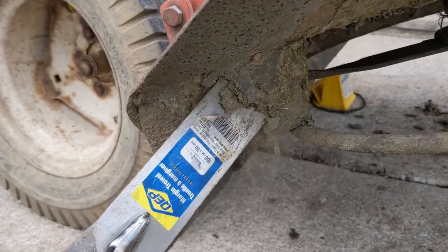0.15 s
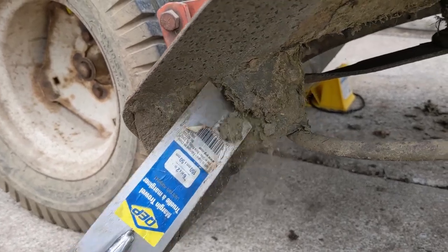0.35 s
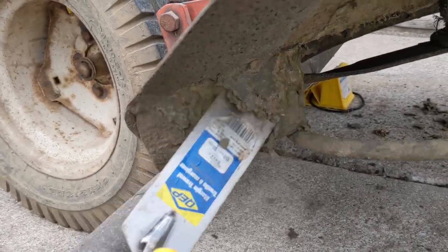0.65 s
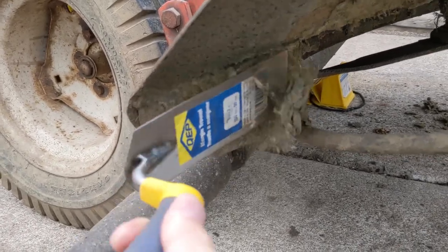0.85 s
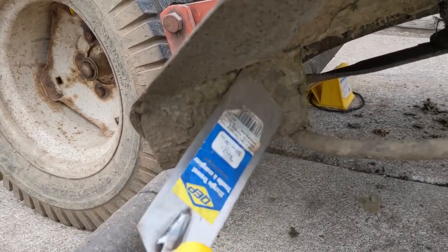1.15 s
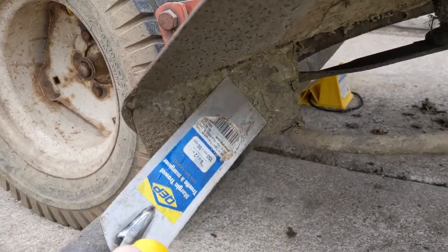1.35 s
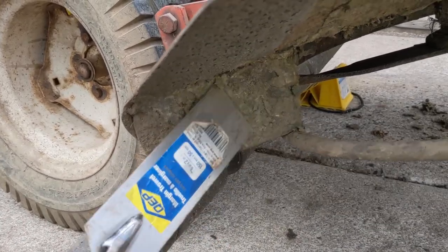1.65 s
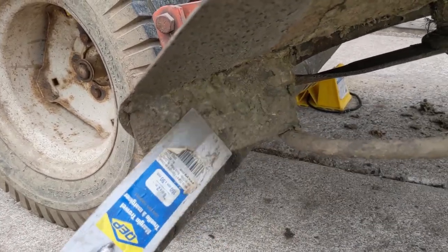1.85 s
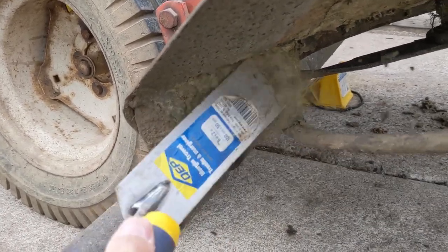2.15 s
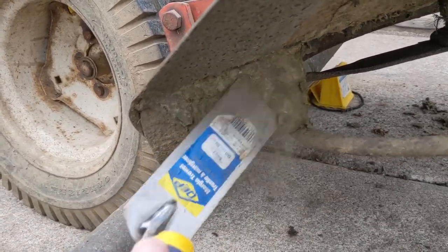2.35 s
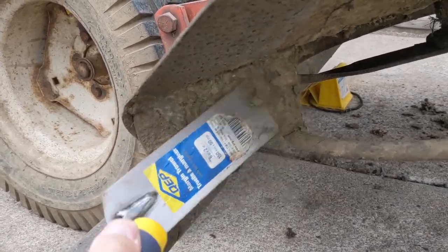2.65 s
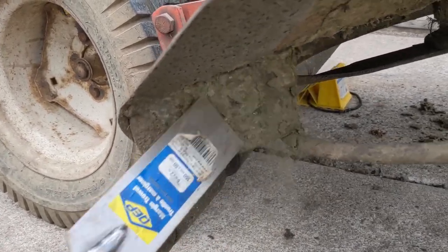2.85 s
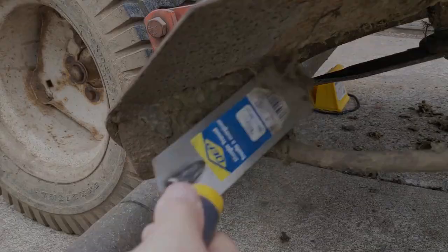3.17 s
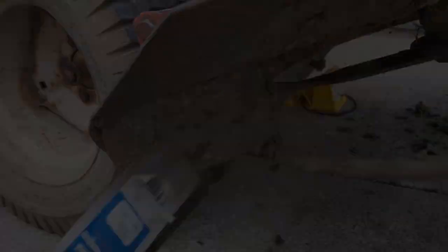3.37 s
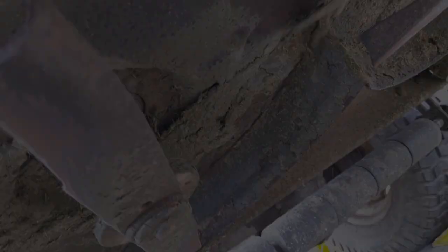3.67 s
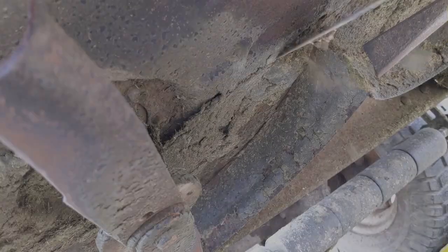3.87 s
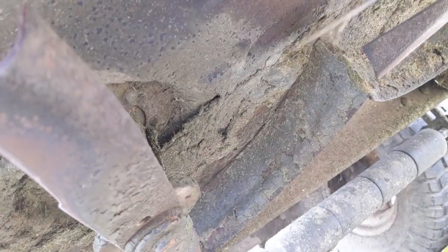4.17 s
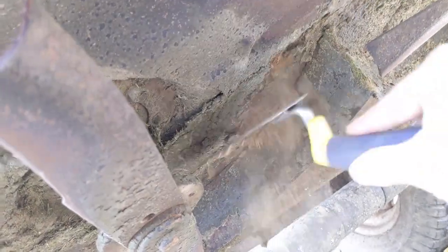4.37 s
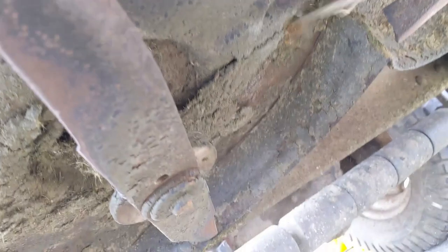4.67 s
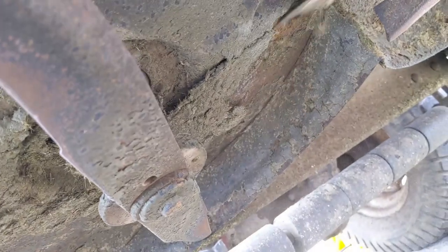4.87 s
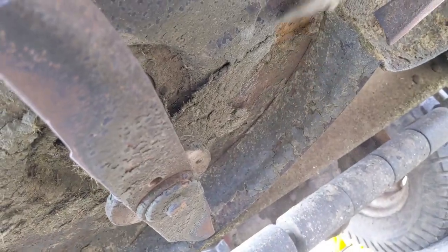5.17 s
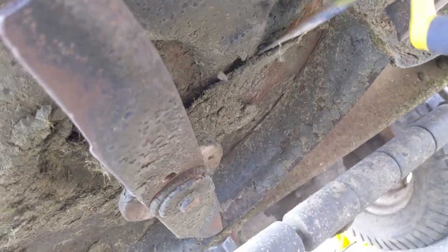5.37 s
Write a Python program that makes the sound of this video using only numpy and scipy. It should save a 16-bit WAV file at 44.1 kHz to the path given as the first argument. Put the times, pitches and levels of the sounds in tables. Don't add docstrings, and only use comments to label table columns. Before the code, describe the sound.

A steel trowel scrapes and jabs caked grass off a mower's metal deck in rough gritty strokes, first from the side, then from underneath.

```python
import sys
import numpy as np
from scipy import signal
from scipy.io import wavfile
from scipy.ndimage import uniform_filter1d

SR = 44100
rng = np.random.default_rng(int(sys.argv[2]) if len(sys.argv) > 2 else 0)


def waveform_to_disk(signal):
    frames = np.transpose(np.atleast_2d(signal))
    scaled = np.clip(frames, -1, 1) * 32767
    samples = np.round(scaled).astype(np.int16)
    wavfile.write(sys.argv[1], SR, samples)


def natural_amplitude(level_db):
    exponent = np.asarray(level_db, float) / 20
    return 10 ** exponent


N = 243431
T = np.arange(N) / SR
HZ = np.fft.rfftfreq(N, 1 / SR)
SCENE_CHANGE_S, UNDER_VIEW_S = 3.564, 3.599

# time_s, force_db
DRAG = [(0, -51), (0.05, -84), (0.249, -48), (0.84, -50), (0.949, -81), (1.66, -57), (1.78, -72.5),
        (2.42, -69), (2.82, -60.5), (2.97, -67), (3.22, -70), (3.4, -45), (3.58, -48), (3.77, -61),
        (4.5, -62), (4.641, -36), (5.07, -60.5), (5.52, -77)]
# start_s, force_db, fall_ms (per 6 dB), fizz_db, body_db
STRIKES = [(0.155, -17, 7, 4.5, -31), (0.301, -17.5, 7, -5, 4.5), (0.358, -19.5, 12, 2.5, -19),
           (0.481, -23, 8.5, 3.5, -19), (0.545, -18.5, 8, 5.5, 5), (0.773, -15.5, 7, -2.5, 6),
           (1.142, -23.5, 5, -9, 9.5), (1.83, -29.5, 30, -6, 4), (1.897, -22, 4, -20, 9.5),
           (2.183, -12, 11.5, -0.5, -6.5), (2.468, -33, 30.5, -2.5, 3), (2.733, -19.5, 2, -4, 6),
           (2.851, -28, 10.5, -6, 10), (3.006, -17, 9, 0, 0), (3.248, -22, 2, 4.5, -28),
           (3.28, -15, 7, 1.5, -13), (4.187, -31.5, 5, 7, -15), (3.433, -15, 8, 1.5, -18),
           (3.602, -24.5, 7, 0, -1.5), (4.071, -22.5, 8.5, -3.5, -33), (3.26, -20, 11, 6.5, -24),
           (4.32, -19, 6, -9, -10), (4.805, -18, 5, 4, -3), (5.385, -18, 2, 6, -1)]
# peak_s, force_db, rise_ms (per 6 dB), fizz_db, body_db
SHOVES = [(0.083, -33, 12, 1, 7), (0.111, -28, 9.5, -15, -34), (0.174, -19.5, 18, -11, -18),
          (1.213, -22.5, 12, -5, -25), (1.848, -19, 8.5, -7.5, -31), (2.201, -17, 10, 0, -36),
          (2.472, -15, 4, -6.5, -17), (2.49, -19, 12, 1.5, 5), (3.47, -14, 0.5, -24, -3),
          (3.492, -16, 12, 1, -22), (3.67, -19, 21.5, -4, 2.5), (3.812, -19, 6.5, -5.5, -24),
          (3.834, -24, 17, -6, -1.5), (3.882, -23, 12, -2.5, 0), (3.91, -16.5, 19.5, -1.5, -3),
          (4.145, -18.5, 18, 3, 5), (4.381, -16, 16, 0, -5.5), (4.574, -29, 21, 7, 1),
          (4.68, -15.5, 12.5, 1.5, -11), (4.745, -18.5, 15, 5, -1), (4.773, -24, 7, 3.5, 5.5),
          (5.004, -22, 18, -2.5, 4), (5.166, -23, 7.5, -3, 2.5), (5.466, -24, 25, 3.5, 3.5)]
# peak_s, force_db, rise_ms, fall_ms (per 6 dB)
SKIMS = [(0.285, -32, 4.6, 50), (0.531, -31, 1, 15), (0.701, -32.5, 22.5, 20), (0.766, -31.5, 19, 20),
         (0.869, -42.5, 15, 46), (0.998, -42.5, 8, 8), (1.032, -41.5, 6, 3), (1.103, -42.5, 36, 7),
         (1.256, -33.5, 43, 8), (1.28, -46, 3, 3), (1.302, -32.5, 9, 11), (1.322, -37, 1.8, 16.5),
         (1.422, -33, 12, 3), (1.572, -40.5, 1.4, 16), (1.708, -37, 5.3, 9), (1.798, -49, 28, 8),
         (2.295, -44, 20, 8), (2.329, -42.5, 21, 10), (2.606, -44, 12, 6), (2.713, -30.5, 8.7, 16),
         (2.75, -30.5, 16, 22), (3.16, -54, 13, 11.5), (2.769, -28, 11, 10.5), (3.116, -45.5, 13, 24),
         (3.307, -32, 4.4, 30), (3.4, -43, 24, 30), (3.347, -23, 1.3, 7), (3.652, -15.5, 7.5, 10.5),
         (4.397, -22.5, 5.9, 10.5), (4.538, -24.5, 8.1, 8.5), (4.596, -33, 22, 7), (4.89, -29.5, 4.3, 9.5),
         (4.937, -36.5, 17, 34), (5.113, -39, 12.7, 32), (5.297, -31, 14, 2)]
# start_s, force_db, fall_ms (per 6 dB)
CLODS = [(0.065, -39, 13), (0.137, -32, 31), (0.612, -37, -4), (1.278, -39.5, 2.5), (1.606, -39, 14),
         (2.032, -48.5, 8.5), (2.11, -52, 13), (2.677, -38, 10), (3.802, -40, 33), (4.41, -38.5, 16.5),
         (4.525, -55, 13), (5.245, -43.5, 16.5), (5.44, -63, 5)]
# pitch_hz, density_db (per Hz)
GRIT_COLOUR = [(59, -42.5), (100, -0.5), (368, 2.5), (529, -19), (1000, 8), (5200, -13), (7170, -19),
               (15100, -17)]
# pitch_hz, width_hz, level_db
PRESSED_BLADE = [(670, 26, -6.5), (1385, 45, -5), (1060, 70, -6), (2190, 80, -6), (2700, 90, -1),
                 (4600, 90, -8), (3950, 90, -4), (6890, 300, -7.5), (7517, 49, -6), (8410, 60, -16),
                 (9786, 250, -4.5), (11730, 120, -9.5)]
# pitch_hz, width_hz, level_db
PAN_SIDE = [(181, 94, -9), (320.3, 67, -7), (424, 105, -14), (810, 180, -9)]
# pitch_hz, width_hz, level_db
PAN_UNDER = [(182, 34, -7.5), (280, 104, -5), (410, 57, -3), (610, 46, -8), (760, 72, -4.5)]
# pitch_hz, level_db
HUM_COLOUR = [(15, -45), (25, 10), (153, 18), (2000, -10.5), (2610, -17.5), (4870, -29.5), (7110, -29.5),
              (12200, -33)]
# time_s, level_db
HUM_LEVEL = [(0, -21), (.08, -43), (3.5, -47), (3.6, -33), (5.52, -38)]
# start_s, end_s, middle_db, upper_db, high_db
CHATTER = [(0.057, 0.148, -51, -61, -52), (0.39, 0.468, -58, -65, -61), (1.061, 1.104, -49, -61, -46.5),
           (1.2, 1.272, -39.5, -58, -50), (2.589, 2.627, -57, -66, -55.5), (2.701, 2.795, -41, -59, -47),
           (3.103, 3.132, -49, -64, -50), (3.25, 3.299, -27, -31.5, -27), (3.301, 3.345, -44, -40, -38),
           (3.347, 3.388, -57, -43.5, -50), (3.389, 3.432, -50, -42, -40.5),
           (3.434, 3.499, -26.5, -29.5, -33), (4.529, 4.56, -29, -35, -35), (4.568, 4.607, -32.5, -40, -37),
           (4.612, 4.664, -45.5, -53, -42), (4.887, 4.923, -45, -47.5, -50), (4.925, 4.993, -51, -53, -44),
           (5.101, 5.131, -38, -47.5, -39), (5.139, 5.181, -40, -48, -38.5),
           (5.421, 5.469, -39, -38.5, -38)]
# pitch_hz, width_hz, level_db
SINGING = [
    [(2596, 29, -1.5), (1886, 40, -10)],
    [(3110, 31, -3.5), (3925, 73, -2), (4550, 60, -13), (5340, 46, -14.5)],
    [(6270, 69, -15), (6965, 56, -5), (7350, 50, -7), (8260, 61, -10), (9740, 90, -11), (12200, 96, -13)],
]
# start_s, peak_db, pitch_hz, t60_s
KNOCKS = [(0.08, -23.5, 760, 0.13), (0.17, -24, 331, 0.21), (1.145, -21.5, 297, 0.076),
          (1.9, -19, 679, 0.21), (0.55, -26.5, 670, 0.28), (3.49, -18, 693, 0.11), (2.105, -34, 500, 0.11),
          (3.65, -16, 392.5, .12), (3.7, -25.5, 410, 0.4), (3.912, -7, 310, .05), (4.125, -22, 610, .08),
          (4.15, -22, 327, .08), (4.385, -15, 410, 0.13), (4.45, -23.5, 413, 0.47),
          (4.755, -15.5, 760, 0.18), (5.0, -20, 845, 0.059), (5.165, -18, 760, .1), (5.2, -28, 280, 0.18),
          (5.47, -14, 399, 0.099)]
# start_s, peak_db, pitch_hz
SNAPS = [(0.11, -17, 1500), (0.154, -12, 3000), (0.301, -14, 2570), (0.481, -13.5, 1500),
         (0.546, -19, 1390), (0.865, -18, 2510), (1.03, -32, 2980), (1.142, -12, 2630), (1.2, -16, 2620),
         (1.22, -11, 1520), (1.39, -33, 1540), (1.831, -15, 1330), (2.469, -10, 2640), (2.71, -26, 1060),
         (2.731, -7.5, 1700), (2.838, -29, 6960), (2.185, -13, 760), (2.48, -14, 706), (3.01, -10, 6900),
         (4.32, -11, 1270), (0.176, -13, 1000), (2.851, -7.5, 1400), (3.248, -19, 2550), (3.26, -4, 2630),
         (3.345, -18, 3100), (3.433, -9.5, 2810), (3.477, -12, 2000), (3.493, -5, 6840), (3.602, -13, 1350),
         (3.647, -9.5, 1150), (3.809, -18, 1400), (3.878, -20, 1920), (4.127, -13, 1300), (4.376, -7, 1390),
         (4.526, -22, 2000), (4.541, -10, 2550), (4.56, -18, 870), (4.572, -19, 2600), (4.596, -29, 2530),
         (4.628, -29, 1210), (4.671, -5, 1890), (4.683, -11, 2380), (4.73, -13, 2330), (4.742, -3.5, 2780),
         (4.773, -16, 4970), (4.803, -5, 2600), (4.888, -20, 2580), (4.937, -20, 6960), (4.987, -18, 910),
         (5.003, -13.5, 900), (5.109, -17, 2520), (5.164, -12, 760), (5.243, -39, 3060),
         (5.384, -12.5, 1930)]
# start_s, pitch_hz, level_db
BITES = [(0.302, 2800, 0.5), (0.482, 3970, 3.5), (0.545, 1430, -2.5), (1.15, 540, 13.5), (1.145, 2230, 4),
         (1.141, 1360, 15.5), (1.145, 680, 11.5), (1.898, 1343, 12.5), (1.897, 740, 7), (2.188, 1490, -3.5),
         (2.48, 2660, 6.5), (2.851, 1070, 8.5), (2.851, 1810, 4), (3.006, 1770, -1.5), (3.259, 2590, 7),
         (2.9, 3070, 7), (3.478, 780, -5), (3.907, 310, 3.5), (4.07, 1270, -3), (4.072, 640, -2.5),
         (4.14, 2660, 5.5), (3.5, 1430, -2), (4.321, 610, -2), (4.319, 2560, -7), (4.383, 347, 5.5),
         (4.745, 730, -4.5), (4.8, 2590, 6.5), (5.165, 1810, 8), (5.17, 1030, 7), (5.384, 1720, 4.5)]
# start_s, stop_s, low_db, middle_db, high_db
RINGS = [(0.304, 0.38, -49, -37, -39), (0.361, 0.42, -37, -48, -35.5), (0.489, 0.5, -45, -36, -33),
         (0.552, 0.57, -30.5, -54, -36), (0.682, 0.72, -52, -39, -53), (1.102, 1.186, -72, -32.5, -44.5),
         (1.325, 1.342, -72, -52, -43), (1.851, 1.953, -43, -49, -37.5), (2.323, 2.376, -67, -41.5, -45),
         (2.865, 2.99, -55, -35, -50), (3.117, 3.23, -70, -42, -52), (3.301, 3.297, -58, -46, -37),
         (3.409, 3.437, -56, -43, -41), (3.51, 3.575, -44, -32, -26.5), (3.947, 4.043, -46, -53, -57),
         (4.435, 4.53, -45, -37, -58), (4.561, 4.544, -50, -29, -46), (4.822, 4.92, -39, -61, -61),
         (5.162, 5.197, -33, -28.5, -52), (5.297, 5.385, -61, -36, -52), (5.391, 5.401, -50, -28, -34)]
# pitch_hz, t60_s, left_lead_rad
FREE_MODES = [(1378, .45, .3), (2582, .38, .9), (3928, .15, 1.2), (7385, .15, 1.2), (3130, .15, 1.)]
HIGH_SHARES_DB = [-1.5, 2, -5]
# start_s, level_db
THUDS = [(0.556, -37), (1.133, -56), (1.885, -54), (2.214, -48), (2.482, -40), (3.011, -39), (3.676, -36),
         (3.909, -36), (4.152, -33.5), (4.404, -38), (4.807, -36), (5.46, -38)]
# pitch_hz, t60_s
TAIL = [(150, 0.3), (500, 0.24), (1500, 0.14), (4000, 0.05), (12000, 0.03)]
# pitch_hz, likeness (0 to 1)
LIKENESS = [(100, 0.26), (600, 0.99), (1500, 0.43), (5000, 0.14), (12000, 0.15)]
# pitch_hz, level_db
BALANCE = [(100, -10), (380, 5), (700, 0.5), (2000, 8), (4400, -0.5), (8100, -4), (14000, 2.5)]
# start_s, lag_samples
LEFT_LAG = [(0, -7), (4.03, 22), (4.5, 2)]


def evened(x):
    return x / np.sqrt(np.mean(x ** 2) + 1e-20)


def read(points, hz):
    f, value = np.transpose(points)
    return np.interp(np.log(hz + 1), np.log(f + 1), value)


def colour(gain):
    log = np.log(np.maximum(gain, 1e-5))
    log = np.concatenate([log, log[-2:0:-1]])
    spectrum = np.exp(log - 1j * signal.hilbert(log).imag)
    taps = np.fft.ifft(spectrum).real[:1024]
    return taps / np.linalg.norm(taps)


def resonances(x, modes, feed=None):
    out = 0
    for k, (hz, width, db) in enumerate(modes):
        r = np.exp(-np.pi * width / SR)
        fed = x if feed is None else x * feed[k]
        ring = signal.lfilter([1, 0, -1], [1, -2 * r * np.cos(2 * np.pi * hz / SR), r * r], fed)
        out = out + (-1) ** k * natural_amplitude(db) * np.sqrt((1 - r * r) / 2) * ring
    return out


def jabs():
    strikes = [(s, db, 0.8, fall, fizz, body) for s, db, fall, fizz, body in STRIKES]
    shoves = [(s, db, rise, 5.34, fizz, body) for s, db, rise, fizz, body in SHOVES]
    skims = [(*row, -0.5, 0) for row in SKIMS]
    clods = [(s, db, 2.5, fall, -5, 12) for s, db, fall in CLODS]
    return strikes + shoves + skims + clods


def strokes():
    s, drag_db = np.transpose(DRAG)
    power = np.array([natural_amplitude(2 * np.interp(T, s, drag_db + d)) for d in (4, 0, 9)])
    for s, db, rise, fall, fizz_db, body_db in jabs():
        part = slice(max(round((s - .12) * SR), 0), round((s + .2) * SR))
        ms = (T[part] - s) * 1000
        swell = (np.minimum(ms, 0) / np.hypot(rise, .4)) ** 2
        fade = np.maximum(ms, 0) / np.hypot(fall, .4)
        crack = np.exp(-(rise / 2) ** 2) * (ms >= 0) * natural_amplitude(-4 * abs(ms))
        for k, (d, linger) in enumerate([(0, 1), (fizz_db, .8), (body_db, 1.2)]):
            shape_db = db + d - 7.0 * swell - 6 * fade / linger
            power[k, part] += natural_amplitude(2 * shape_db) * (1 + 1.1 * crack * (k != 1))
    return np.sqrt(power)


def slips(per_s=3500, spread_db=3.5, hiss=0.52):
    size = natural_amplitude(spread_db * np.minimum(rng.exponential(1, N), 3))
    size = size * (rng.random(N) < per_s / SR)
    clumps = natural_amplitude(2.33 * evened(uniform_filter1d(rng.standard_normal(N), size=90)))
    signs = np.tanh(rng.standard_normal((2, N)))
    return evened(clumps * (evened(size * signs) + hiss * rng.standard_normal((2, N))))


def wander(count, depth_db=5.5):
    per_s = 25
    steps = 2 * np.tanh(rng.standard_normal((count, int(N / SR * per_s) + 2)) / 2)
    return natural_amplitude(depth_db * np.array([np.interp(T * per_s, np.arange(len(v)), v) for v in steps]))


def crust(x, depth_db=3.5):
    z = signal.stft(x, nperseg=256, noverlap=192)[2]
    field = rng.standard_normal(z.shape[1:][::-1]).T
    field = uniform_filter1d(field, size=5, axis=0)
    field = evened(uniform_filter1d(field, size=18, axis=1))
    return signal.istft(z * natural_amplitude(depth_db * field), nperseg=256, noverlap=192)[1][:, :N]


def sheet(middle, fizz, count=36):
    places = np.geomspace(1850, 14000, count) * rng.uniform(.96, 1.04, count)
    feed = wander(count, depth_db=5.)
    out = 0
    for hz, gain in zip(places, feed):
        push = fizz if hz > 5000 else middle
        out = out + resonances(push * gain, [(hz, 90, -17 - 2. * np.log2(hz / 2000))])
    return out


def scrape():
    force, drive = strokes(), slips()
    middle, fizz, body = force[:, None] * drive
    hz = np.fft.rfftfreq(4096, 1 / SR)
    low = 1 / (1 + (hz / 850) ** 6) / (1 + (200 / (hz + 1)) ** 4)
    high = 1 / (1 + (5600 / (hz + 1)) ** 4)
    mid = (1 - high) / (1 + (720 / (hz + 1)) ** 6)
    grit = natural_amplitude(read(GRIT_COLOUR, hz))
    dirt_mid, dirt_fizz, dirt_body = [
        signal.oaconvolve(push, colour(grit * np.sqrt(share))[None])[:, :N]
        for push, share in zip((middle, fizz, body), (mid, high, low))]
    dirt = crust(natural_amplitude(-1.0) * dirt_mid + natural_amplitude(-8.5) * dirt_fizz) + natural_amplitude(-4.0) * dirt_body

    blade = resonances(middle, PRESSED_BLADE[1:7], wander(6))
    blade = blade + natural_amplitude(5.5) * resonances(fizz, PRESSED_BLADE[7:], wander(5))
    side_view = T < SCENE_CHANGE_S
    pan = resonances(body * side_view, PAN_SIDE, wander(4))
    pan = pan + resonances(body * ~side_view, PAN_UNDER, wander(5))
    firm = force[0] ** 2 / (force[0] + natural_amplitude(-54))
    blade_low = resonances(firm * drive * side_view * natural_amplitude(-1.5 * T), PRESSED_BLADE[:1], wander(1))
    return dirt + natural_amplitude(-9) * blade + blade_low + natural_amplitude(-5.0) * pan + bites(middle) + sheet(middle, fizz)


def hum():
    frames, hz = N // 512 + 5, np.fft.rfftfreq(2048, 1 / SR)
    a, b, c, d, patches = rng.standard_normal((frames, 1025, 5)).T
    patches = uniform_filter1d(patches, size=6, axis=0)
    patches = evened(uniform_filter1d(patches, size=8, axis=1))
    left, other = a + 1j * b, c + 1j * d
    z = np.array([left, .6 * left + .8 * other])
    z *= natural_amplitude(3.2 * patches)
    z *= natural_amplitude(read(HUM_COLOUR, hz)[:, None])
    rumble = evened(signal.istft(z, nperseg=2048, noverlap=1536)[1][:, :N])
    return natural_amplitude(np.interp(T, *np.transpose(HUM_LEVEL))) * rumble


def chatter():
    out = np.zeros((2, N))
    for s, end, *levels_db in CHATTER:
        part = slice(round((s - .01) * SR), round((end + .06) * SR))
        t = T[part]
        taps = rng.standard_normal((2, len(t))) * (.5 + 3 * (rng.random(len(t)) < .02))
        taps *= np.clip(np.minimum(1 + (t - s) / .004, 1 + (end - t) / .008), 0, 1)
        for db, modes in zip(levels_db, SINGING):
            out[:, part] += natural_amplitude(db + 9.5) * resonances(taps, modes)
    return out


def knocks():
    out, t = np.zeros(N + SR), np.arange(SR // 3) / SR
    rise = 1 - np.exp(-t / .002)
    for s, db, hz, t60 in KNOCKS:
        out[round(s * SR):][:len(t)] += natural_amplitude(db - 60 * t / t60) * rise * np.sin(2 * np.pi * hz * t)
    return natural_amplitude(np.array([[2.], [-2.5]])) * out[:N]


def snaps(t60_s=.014):
    out, t = np.zeros(N + SR), np.arange(SR // 20) / SR
    grit = rng.standard_normal((len(SNAPS), len(t)))
    for (s, db, hz), noise in zip(SNAPS, grit):
        click = 0.64 * noise * np.exp(-t / 0.00095)
        ring = np.sin(2 * np.pi * hz * t)
        out[round(s * SR):][:len(t)] += natural_amplitude(db - 3.5 - 60 * t / t60_s) * (ring + click)
    return out[:N]


def bites(force):
    out = np.zeros((2, N))
    for s, hz, db in BITES:
        part = slice(round((s - .012) * SR), round((s + .1) * SR))
        t = T[part] - s
        held = force[:, part] * np.clip((.035 - t) / 0.017, 0, 1) * np.clip(1 + t / 0.0022, 0, 1)
        out[:, part] += resonances(held, [(hz, 150, db)])
    return out


def rings():
    out = np.zeros((2, N))
    phases = rng.uniform(0, 2 * np.pi, (len(RINGS), len(FREE_MODES)))
    for (s, stop, low_db, middle_db, high_db), phase in zip(RINGS, phases):
        part = slice(round((s - .01) * SR), round((stop + .04) * SR))
        t = T[part] - s
        gate = np.clip(1 + t / .01, 0, 1) * natural_amplitude(-800 * np.maximum(t + s - stop, 0))
        levels_db = [low_db, middle_db, *np.add(high_db, HIGH_SHARES_DB)]
        for (hz, t60, lead), db, p in zip(FREE_MODES, levels_db, phase):
            tone = np.sin(2 * np.pi * hz * t + p + np.array([[lead], [0]]))
            out[:, part] += gate * natural_amplitude(db + 7.5 - 60 * t / t60) * tone
    return out


def thuds(hz=57, t60_s=.12):
    out, t = np.zeros(N + SR), np.arange(SR // 5) / SR
    rock = (1 - np.exp(-t / 0.028)) * np.sin(2 * np.pi * hz * t)
    for s, db in THUDS:
        out[round(s * SR):][:len(t)] += natural_amplitude(db + 20.5 - 60 * t / t60_s) * rock
    return np.array([natural_amplitude(4.5) * out[:N], natural_amplitude(6.5) * out[110:N + 110]])


def scene_change_tick():
    t = T - 3.572
    noise = np.diff(uniform_filter1d(rng.standard_normal(N + 1), size=3))
    tone = 0.78 * np.sin(2 * np.pi * 3000 * t)
    return natural_amplitude(-17.0) * np.exp(-(t / 0.0011) ** 2) * (tone + 1.2 * noise)


def tail(x):
    hz, t, z = signal.stft(rng.standard_normal(SR // 2), SR, nperseg=256)
    taps = signal.istft(z * natural_amplitude(-60 * t / read(TAIL, hz)[:, None]), SR, nperseg=256)[1]
    return signal.fftconvolve(x, taps[None] / np.linalg.norm(taps), axes=1)[:, :N]


def two_microphones(pair):
    a, b = np.fft.rfft(pair)
    same = np.clip(read(LIKENESS, HZ), 0, 1)
    tilt = natural_amplitude(read(BALANCE, HZ) / 2)
    bass = 1 / (1 + (HZ / 1700) ** 6)
    low = np.fft.irfft(a * tilt * bass, N)
    high = np.fft.irfft(a * tilt * (1 - bass), N)
    right = np.fft.irfft((same * a + np.sqrt(1 - same ** 2) * b) / tilt, N)
    s, lag = np.transpose(LEFT_LAG)
    shifted = np.arange(N) - lag[np.searchsorted(s, T, "right") - 1].astype(int)
    return np.array([low + high[np.clip(shifted, 0, N - 1)], right])


def scene():
    first = T < SCENE_CHANGE_S
    sounding = first | (T >= UNDER_VIEW_S)
    near = (scrape() + chatter() + snaps()) * sounding
    free = rings() * sounding
    wet = tail(near * first) * first + tail(near * ~first)
    close = two_microphones(near + natural_amplitude(-8) * wet)
    return close + free + knocks() + thuds() + hum() + scene_change_tick()


def band_limit(x):
    return signal.sosfilt(signal.butter(12, 16830, fs=SR, output="sos"), x)


def record(dry):
    dry = signal.sosfilt(signal.butter(2, 42, "highpass", fs=SR, output="sos"), dry)
    squeezed = dry / (1 + (dry / .88) ** 4) ** .25
    limit = signal.firwin(255, 15850, window=("kaiser", 9), fs=SR)
    mix = signal.oaconvolve(squeezed, limit[None], "same")
    return band_limit(mix)


dry = scene()
out = record(dry)
waveform_to_disk(out)
```